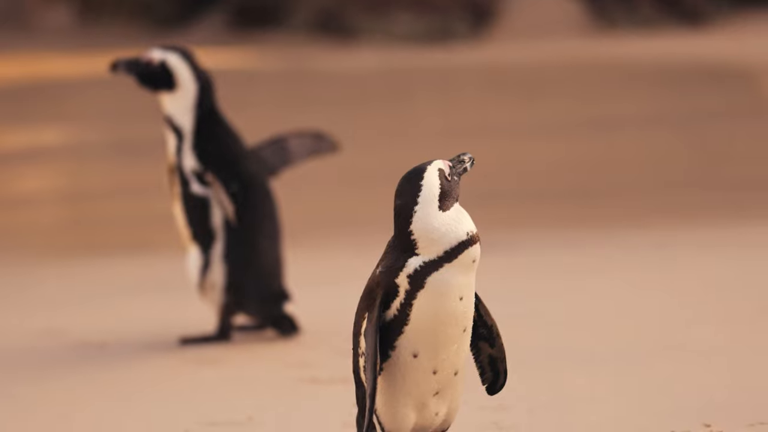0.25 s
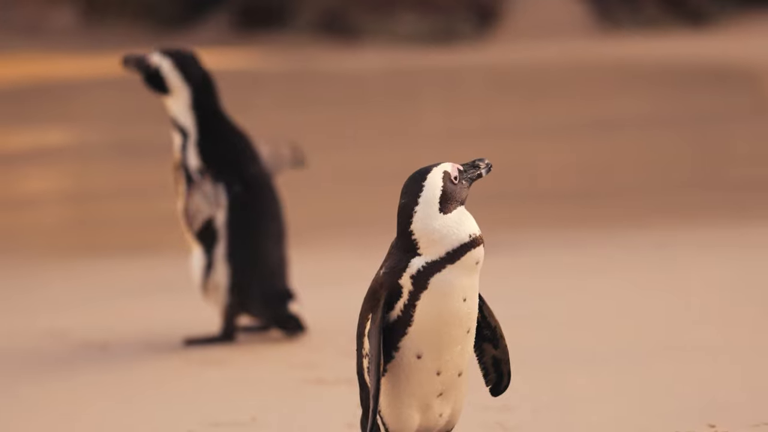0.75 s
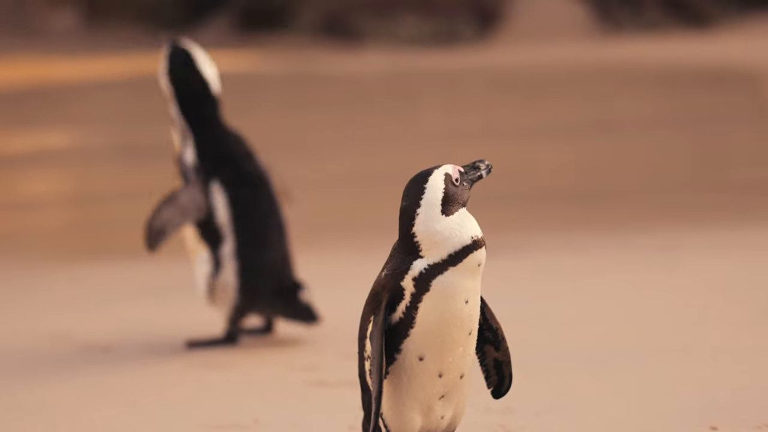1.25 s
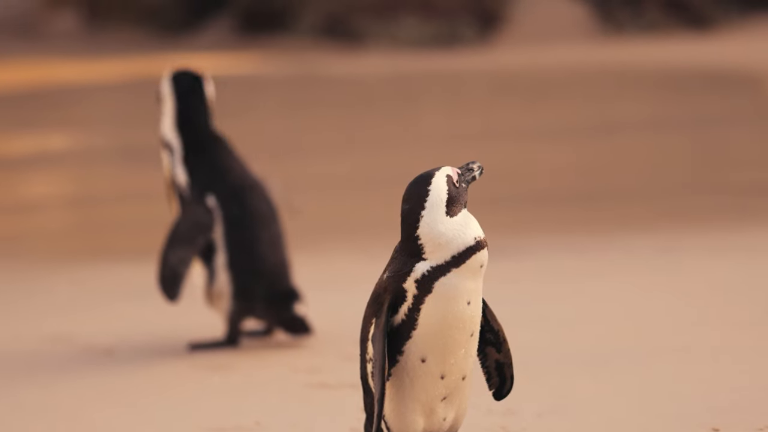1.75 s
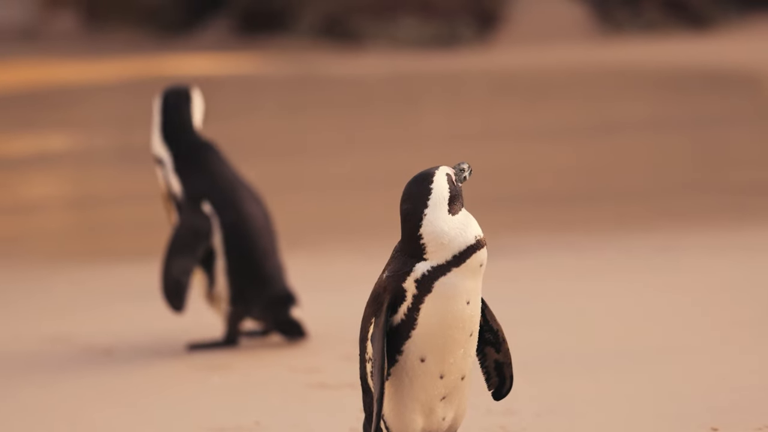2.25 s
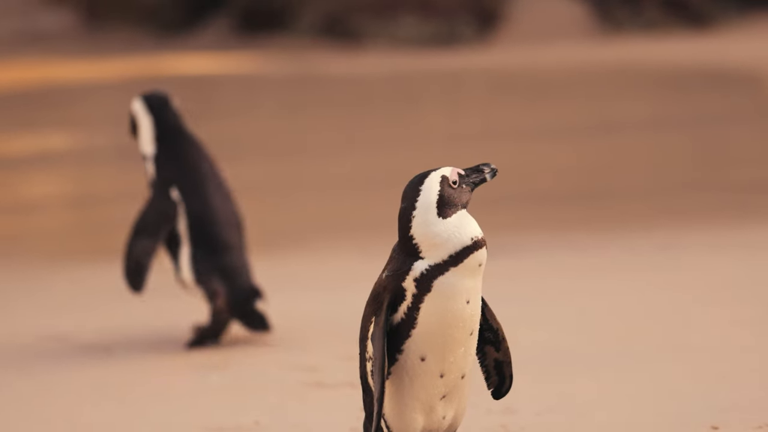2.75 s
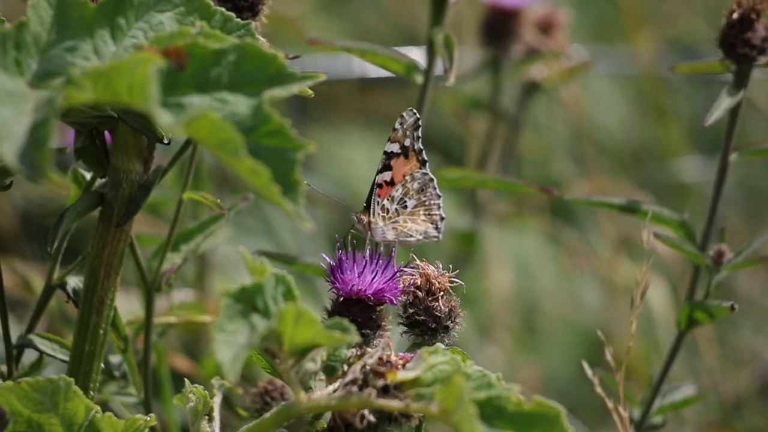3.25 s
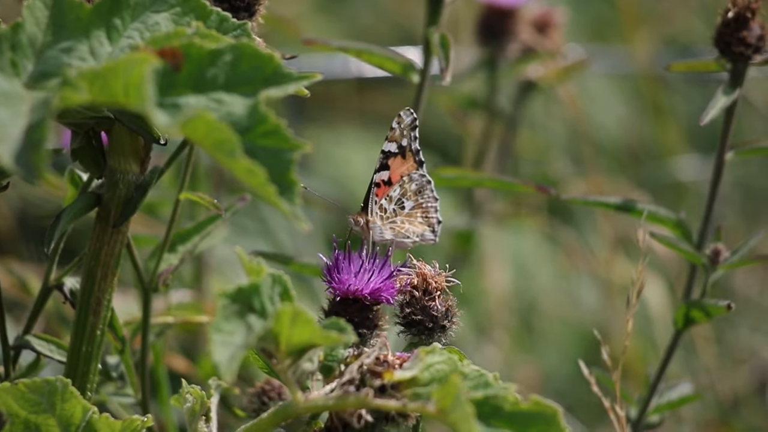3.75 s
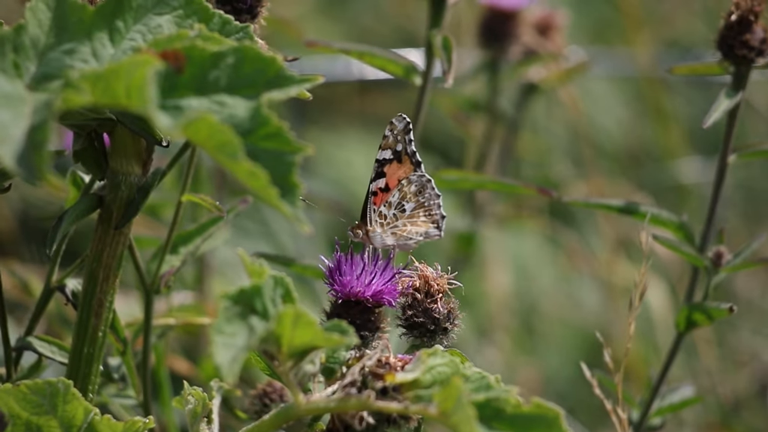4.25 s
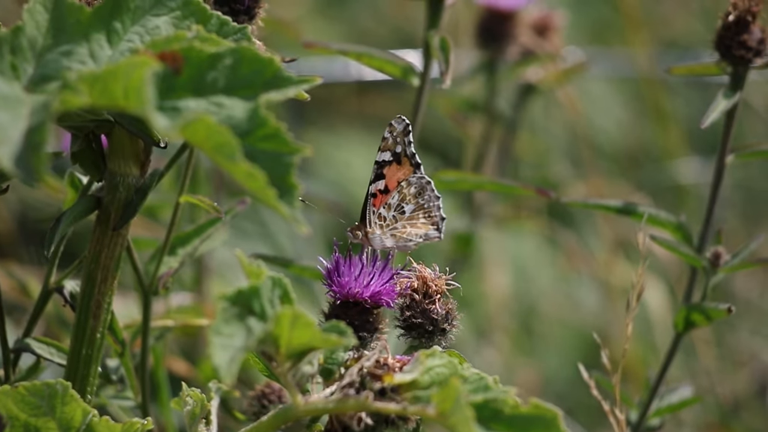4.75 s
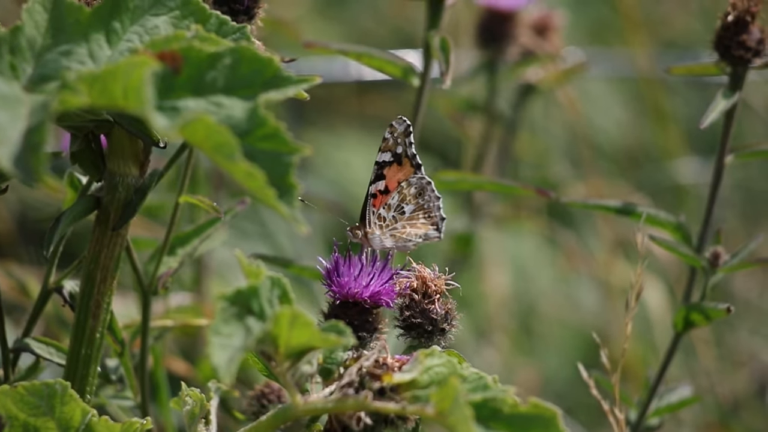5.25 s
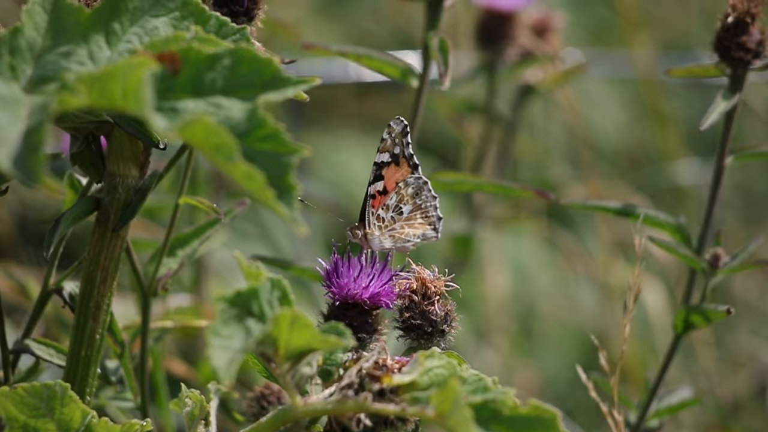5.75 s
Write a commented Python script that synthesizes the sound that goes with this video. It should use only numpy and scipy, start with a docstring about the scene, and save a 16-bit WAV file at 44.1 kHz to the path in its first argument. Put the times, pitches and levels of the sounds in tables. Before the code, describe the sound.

First half: loud, close, fairly dry penguin voices, starting with loose throat rattles and a brief nasal squeal, then three increasingly bright, rasping brays with machine-fast yelps, over soft shore wash and sandy bumps. A hard cut stops the last one before its shriek. Second half: faint outdoor hush, thin insect chirring, distant bird chips, and a songbird's rapid sliding twitter leaning slightly left, ending in a repeated two-note trill.

```python
"""Beach: penguins close by, over shore wash and dull bumps. A rattle tightens into a clean squeal; then
three brays, each a rasp breaking into arched, climbing yelps; two reach a shriek, the third is cut off.
The scene cuts to a quiet meadow: a small songbird twitters over insects and a far hum.
Voices: membrane slaps as noisy pulse trains, steady registers as harmonic sums, yelps and birdsong as
gliding tones. Wash, bumps and air: shaped noise. Insects: pulsed narrow-band noise. Hum: wavering sine."""
import sys
import numpy as np
from scipy import signal
from scipy.fft import rfft, irfft, next_fast_len
from scipy.io import wavfile
from scipy.ndimage import uniform_filter1d, map_coordinates

SR = 44100
rng = np.random.default_rng(int(sys.argv[2]) if len(sys.argv) > 2 else 0)


def wrap_up_sound(samples):
    """Save the sound to the file named by the first command line argument, as 16-bit audio."""
    columns = np.atleast_2d(samples).T
    # keep every value between -1 and 1, then stretch to whole-number steps
    tamed = np.clip(columns, -1, 1)
    steps = np.round(tamed * 32767).astype(np.int16)
    wavfile.write(sys.argv[1], SR, steps)


N = 264644

# shore wash spectrum: f/Hz, level/dB
WASH_SPECTRUM = [(18, -63), (30, -25), (98, -5), (287, 1.5), (458, -14.5), (586, -7.5), (868, -14.5),
                 (2100, -7.5), (4730, -21.5), (6000, -30), (10600, -39.5), (13800, -84.5), (22000, -120)]
# meadow air spectrum: f/Hz, level/dB
AIR_SPECTRUM = [(40, -33.5), (110, -10), (180, -1), (480, -17), (630, -9), (1500, -20), (2000, -14.5),
                (2900, -19.5), (3600, -7), (5200, -7), (7700, -14.5), (9400, -1.5), (10500, -12),
                (11500, -54)]
# bumps on the sand: t/s, level/dB
BUMPS = [(0.251, -26), (.371, -20), (0.411, -25), (0.72, -21), (0.75, -21), (0.886, -25), (1.103, -30),
         (1.467, -31), (1.625, -25), (1.791, -30), (2.426, -34)]
# bump spectrum: f/Hz, level/dB
BUMP_SPECTRUM = [(24, -45.5), (40, -22), (90, 2), (140, 1), (462, -16.5), (1200, -35), (1560, -66),
                 (2640, -120)]

# songbird figures, one row a note: t in figure/s, length/s, first f/Hz, middle f/Hz, last f/Hz, level/dB
OPENING = [(0, 0.0292, 5060, 4830, 4480, -40.5), (.065, 0.03, 8060, 7140, 5600, -38.5),
           (.093, .023, 5250, 4280, 3130, -37.5), (.115, .14, 1690, 1804, 2420, -55),
           (.198, .032, 4000, 4400, 3100, -36), (.253, 0.087, 5736, 5450, 5470, -36.5)]
# falling then rising notes, columns as OPENING: t/s, length/s, 3 x f/Hz, level/dB
DIP = [(0, 0.041, 5690, 4940, 3230, -37), (.047, 0.025, 3180, 3550, 4780, -43),
       (.076, .035, 5650, 6400, 7600, -41)]
# three falling notes and a rise, columns as OPENING: t/s, length/s, 3 x f/Hz, level/dB
DROOP = [(0, 0.06, 6620, 6345, 5930, -39.5), (.055, .05, 5950, 4710, 4200, -40),
         (.112, 0.0287, 3840, 3510, 3170, -50), (.155, 0.03, 3180, 3590, 4300, -43)]
# low note, rise, steep fall, columns as OPENING: t/s, length/s, 3 x f/Hz, level/dB
HOOK = [(0, .04, 3570, 3607, 3140, -44), (.064, .024, 3800, 6100, 6360, -42),
        (.088, .028, 7000, 5050, 3550, -44.5)]
# one falling note, columns as OPENING: t/s, length/s, 3 x f/Hz, level/dB
SWOOP = [(0, .066, 7300, 5250, 4900, -41)]
# figure repeated in the trill, columns as OPENING: t/s, length/s, 3 x f/Hz, level/dB
TICK_SLUR = [(0, .018, 7520, 6640, 6700, -39.5), (.034, .036, 6510, 4790, 3590, -39)]
# song: figure, list of start t/s
SONG = [(OPENING, [3.005]), (DIP, [3.553, 3.795]), (DROOP, [4.015, 4.28]), (HOOK, [4.636, 4.864]),
        (SWOOP, [5.575, 5.63, 5.942])]
# held songbird notes, plain or trilled: t/s, length/s, f/Hz, level/dB, trill depth/share of pitch
BUZZES = [(5.079, 0.082, 6720, -45, 0.11), (5.14, 0.43, 4460, -50.5, .001),
          (5.732, 0.076, 3890, -41.5, 0.097)]

# rattle bursts: t/s, length/s, level/dB
RATTLE_BURSTS = [(0, 0.11, -22), (.146, 0.041, -22.5), (.213, 0.017, -21.5), (0.258, 0.0072, -20),
                 (0.292, 0.079, -28.5), (0.454, .08, -34.5), (0.837, 0.044, -30), (0.962, 0.11, -36)]
# rattling throat spectrum: f/Hz, level/dB
RATTLE_SPECTRUM = [(290, -67), (500, -28.5), (782, -25), (1600, -5.5), (2120, 1), (2700, -8.5),
                   (4020, -23.5), (4570, -19), (5680, -31.5), (7430, -25.5), (10600, -48), (13800, -88),
                   (22000, -120)]
# squeal register 1, creak: t/s, f/Hz, level/dB
CREAK = [(.44, 284.4, -45.5), (.47, 296, -25.5), (.51, 339, -25), (.553, 352, -17.5)]
# register 2, clean tone: t/s, f/Hz, level/dB
CLEAN_TONE = [(.554, 421.3, -17.5), (.6, 424.4, -15.5), (.673, 432, -15), (.688, 420, -15),
              (.761, 414, -17), (.808, 413.5, -19.5), (.825, 396, -34)]
# register 3, slide: t/s, f/Hz, level/dB
SLIDE = [(.815, 2093, -15.5), (.828, 1998, -24.5), (.843, 1775, -19.5)]
# register 4, sag: t/s, f/Hz, level/dB
SAG = [(.838, 334, -25), (.867, 339.4, -24.5), (.88, 335, -24), (.922, 318, -26)]
# register 5, whistle: t/s, f/Hz, level/dB
WHISTLE = [(.919, 1584, -29), (.95, 1520, -27), (.968, 1466, -37)]
# tight throat spectrum: f/Hz, level/dB
TIGHT_THROAT = [(1250, -40.5), (1700, -9), (2120, -0.5), (2550, -6.5), (2950, -22.5), (3400, -24),
                (4100, -21.5), (5600, -53.5), (7000, -37), (12000, -72)]
# open throat spectrum: f/Hz, level/dB
OPEN_THROAT = [(300, -35.5), (1400, -23.5), (2100, -6.5), (2650, 1.5), (3100, -6.5), (3700, -25),
               (4700, -22), (5700, -41.5), (8000, -35), (12000, -58.5)]

# brays: flutter lock t/s, lead of ragged yelps/s, flutter length/s, f/Hz, first clean yelp length/s,
# ragged level/dB, clean level/dB, split level/dB, rasp level/dB, squeak between clean yelps level/dB
BRAYS = [(1.498, .122, 0.12, 2756, .007, -10, -11, -13, -24.5, -47),
         (2.163, 0.12, .13, 2952, .018, -11, -9, -12, -24.5, -29),
         (2.833, .1, .103, 2980, .011, -15, -9, -10.5, -23.5, -18)]
# rasping throat spectrum: f/Hz, level/dB
RASP_SPECTRUM = [(70, -38.5), (310, 7.5), (450, -13), (700, -4.5), (1100, -11), (1700, 0.5), (3400, -4),
                 (5700, -20), (8200, -21), (10600, -36.5), (12500, -59.5)]
# yelp partials: multiple of pitch, level/dB
YELP_PARTIALS = [(1, 2.5), (1.5, -18.5), (2, -19.5), (3, -20.5)]
# beak opening from bray to bray: t/s, treble level/dB
BEAK_OPENING = [(1.4, -7), (2.05, 4.5), (3, 7.5)]

CUT_S, TOP_HZ = 3.008, 15700  # beach to meadow; band limit
FAR_CALLS_START_S, FAR_CALLS_END_S = 3.4, 5.95
TWITTER_START_S, TWITTER_END_S = 5.1, 5.82
TRILL_START_S, TRILL_PACE_S = 5.017, .1213
TRILL_FIRST_DB, TRILL_GROWS_DB = -11.5, 1.57  # first repeat; gain per repeat
RATTLE_ATTACK_S, RATTLE_RELEASE_S = .0082, .025  # per 30 dB
# spacing of yelp centres in each stage
RAGGED_PACE_S, FLUTTER_PACE_S, SPLIT_PACE_S = .0315, .0257, .0294
RAGGED_FIRST_S, RAGGED_YELP_S, YELP_S = .015, .0033, .0071  # yelp lengths
SETTLE_YELPS = 1  # decay constant of the excess length at the start of a run
RAGGED_FADE_DB, SPLIT_GROWS_DB = 1, 1.2  # change per yelp
DRAWN_OUT_DB = 1.8  # loss per doubling of length
HALF_S, HALF_GAP_S, HALF_DROP_DB = .0043, .0093, 2.5  # split yelp: half length, spacing, loss of second
SHRIEK_AFTER_S = .244  # after the lock
SHRIEK_S, SHRIEK_DB, SHRIEK_HZ = .013, -8.5, 3400
RASP_LEAD_S, RASP_TRAIL_S = .1771, .02  # full this long before the lock and after the shriek
RASP_ATTACK_S, RASP_RELEASE_S = .03, .05  # per 30 dB
RASP_START_DB = -2.5  # swells from here to the first ragged yelp
# fade towards the lock, dip in the flutter, push at the shriek
RASP_FADE_DB, RASP_LOCKED_DB, RASP_LAST_DB = -6, -17.5, 4


def amp(db):
    """Decibels to gain."""
    return 10 ** (np.asarray(db) / 20)


def unit(x):
    """Scale to rms 1."""
    return x / np.sqrt(np.mean(x ** 2) + 1e-20)


def along(points, hz):
    """(f/Hz, value) points read on a log axis."""
    f, v = np.transpose(points)
    return np.interp(np.log(hz + 1), np.log(f + 1), v)


def clock():
    """Time of every sample, s."""
    return np.arange(N) / SR


def curves(rows):
    """One value per sample for each column after the time."""
    s, *cols = np.transpose(rows)
    return [np.interp(clock(), s, c) for c in cols]


def gate(start_s, end_s, edge_s=.0031):
    """1 between two times, with linear ramps."""
    inside = np.minimum(clock() - start_s, end_s - clock())
    return np.clip(inside / edge_s + .5, 0, 1)


def held(start_s, end_s, attack_s, release_s):
    """Full level between two times, reached and left at a steady rate in dB."""
    t = clock()
    early = np.maximum(start_s - t, 0) / attack_s
    late = np.maximum(t - end_s, 0) / release_s
    return amp(-30 * (early + late))


def noise(size=N):
    """White noise."""
    return rng.standard_normal(size)


def wobble(rate_hz, size=N):
    """Smooth random curve, rate_hz knots a second."""
    knots = noise(int(size * rate_hz / SR) + 4)
    return map_coordinates(knots, [np.arange(size) * rate_hz / SR])


def oscillate(pitch_hz):
    """Sine of varying pitch: phase is the running sum of frequency."""
    return np.sin(2 * np.pi * np.cumsum(pitch_hz) / SR)


def filtered(x, response):
    """Zero-phase filter: spectrum times a response of frequency."""
    m = next_fast_len(N + SR // 2)
    return irfft(rfft(x, m) * response(np.fft.rfftfreq(m, 1 / SR)), m)[..., :N]


def coloured(x, spectrum, size=4096):
    """Minimum-phase filter of the given spectrum, scaled to rms 1."""
    gain = amp(along(spectrum, np.fft.rfftfreq(size, 1 / SR)))
    cepstrum = irfft(np.log(gain + 1e-6))
    # folding the cepstrum makes the response causal
    cepstrum[1:size // 2] *= 2
    cepstrum[size // 2 + 1:] = 0
    ringing = irfft(np.exp(rfft(cepstrum)))
    return unit(signal.fftconvolve(x, ringing)[:N])


def add(track, start_s, sound):
    """Mix a short sound into a track."""
    i = int(np.clip(round(start_s * SR), 0, N))
    track[i:i + len(sound)] += sound[:N - i]


def echo(x, t60_s):
    """Diffuse decaying tail of unit energy, without the direct sound."""
    t = np.arange(SR // 2) / SR
    tail = noise(len(t)) * amp(-60 * t / t60_s) * (t > .004)
    return signal.fftconvolve(x, tail / np.linalg.norm(tail))[:N]


def wide(source, spread):
    """Two draws of a source as middle and side."""
    middle, side = source(), spread * source()
    return np.array([middle + side, middle - side])


def air():
    """Still meadow air: steady shaped noise."""
    return amp(-56.5) * wide(lambda: coloured(noise(), AIR_SPECTRUM), spread=.64)


def hum():
    """Far hum: sine wavering in pitch and level, stronger on the left."""
    tone = oscillate(167 + wobble(23))
    return amp(-64.5 + wobble(1.54)) * tone * amp([[2], [-3]])


def insect(centre_hz, width_hz, rate_hz, db):
    """Thin chirps of wing strokes: narrow-band noise in half-sine pulses with gaps between."""
    band = unit(filtered(noise(), lambda hz: 1 / (1 + (2 * (hz - centre_hz) / width_hz) ** 4)))
    chirps = np.maximum(np.sin(2 * np.pi * rate_hz * clock() + .5 * wobble(5.7)), 0)
    return amp(db) * unit(band * chirps)


def insects():
    """Two chirping bands at different rates."""
    return insect(9260, 450, rate_hz=4.9, db=-63) + insect(8840, 510, rate_hz=7.4, db=-58)


def note(length_s, first_hz, middle_hz, last_hz, db, trill=0):
    """Whistled parabolic glide through three pitches; a fast trill turns it into a buzz."""
    size = int(length_s * SR)
    u = np.linspace(0, 1, size)
    glide = np.polyval(np.polyfit([0, .5, 1], [first_hz, middle_hz, last_hz], 2), u)
    buzz = np.sin(2 * np.pi * 150 * u * length_s + 2 * wobble(140, size))
    pitch = glide * (1 + .0059 * wobble(400, size) + trill * buzz)
    swell = np.tanh(2 * np.sin(np.pi * u)) * amp(db + 2.66 * wobble(105, size))
    return swell * oscillate(pitch)


def far_calls(centre_hz=2050, db=-69, count=14):
    """Another bird chips faintly far off: short falling notes heard only as echoes."""
    track = np.zeros(N)
    for when, height in rng.uniform(-1, 1, (count, 2)):
        hz = centre_hz * np.exp(.18 * height)
        start_s = np.interp(when, [-1, 1], [FAR_CALLS_START_S, FAR_CALLS_END_S])
        add(track, start_s, note(.0336, 1.08 * hz, hz, .95 * hz, db))
    return echo(track, t60_s=.3)


def twitter(db=-52, count=44):
    """Softer gliding chirps at random times crowd in among the last slurs."""
    track = np.zeros(N)
    for when, height, sweep, strength in rng.uniform(-1, 1, (count, 4)):
        hz = 4700 * np.exp(.33 * height)
        tilt = np.copysign(.15, sweep - .3)  # most fall
        start_s = np.interp(when, [-1, 1], [TWITTER_START_S, TWITTER_END_S])
        add(track, start_s, note(.026, hz * (1 - tilt), hz, hz * (1 + tilt), db + 2 * strength))
    return track


def songbird():
    """Gliding figures lead into an even, swelling trill; vegetation scatters a tail to each side."""
    song = np.zeros(N)
    figures = [(figure, start_s, 0) for figure, starts in SONG for start_s in starts]
    repeats = np.arange(TRILL_START_S, N / SR, TRILL_PACE_S)
    for k, start_s in enumerate(repeats):
        figures.append((TICK_SLUR, start_s, TRILL_FIRST_DB + TRILL_GROWS_DB * k))
    for figure, start_s, db in figures:
        for offset_s, *shape in figure:
            add(song, start_s + offset_s, amp(db) * note(*shape))
    for start_s, length_s, hz, db, trill in BUZZES:
        add(song, start_s, note(length_s, hz, hz, hz, db, trill))
    scatter = np.array([echo(song, t60_s=.25) for side in range(2)])
    return song + amp(-4) * scatter


def wash():
    """Restless shore wash: shaped noise of wandering level."""
    return amp(-41.5 + 3.4 * wobble(14)) * coloured(noise(), WASH_SPECTRUM)


def bumps(t60_s=.12):
    """Dull bumps and scuffs on the sand: decaying bursts of low noise."""
    blows, t = np.zeros(N), np.arange(SR // 5) / SR
    for start_s, db in BUMPS:
        add(blows, start_s, amp(db - 60 * t / t60_s) * (1 - np.exp(-t / .001)))
    return blows * coloured(noise(), BUMP_SPECTRUM)


def flaps(rate_hz, jitter, scatter_db, air_share):
    """Uneven slaps of the throat membranes, each letting out a puff of air."""
    cycles = np.cumsum(rate_hz * np.exp(jitter * wobble(rate_hz))) / SR
    slaps = np.diff(np.floor(cycles), prepend=0)  # one impulse a cycle
    puffs = noise() * np.exp(-3 * (cycles % 1))
    level = amp(scatter_db * np.tanh(wobble(rate_hz)))
    return (unit(slaps) + air_share * unit(puffs)) * level


def windpipe(x, delay_s, reflection):
    """A reflection from the end of the flexing windpipe makes shifting resonances."""
    lag = delay_s * SR * np.exp(.25 * wobble(30))
    return x + reflection * map_coordinates(x, [np.arange(N) - lag], order=1)


def register(rows, throat, jitter, shimmer_db, even=False):
    """Steady vibration: harmonics shaped by the throat; even phases fill the cycle, else it pulses."""
    pitch, db = curves(rows)
    window = gate(rows[0][0], rows[-1][0])
    on = window > 0
    pitch = (pitch * np.exp(jitter * wobble(300)))[on]
    k = np.arange(1, 29)[:, None]
    gains = amp(along(throat, k * pitch)) * (k * pitch < TOP_HZ)
    phase = 2 * np.pi * k * np.cumsum(pitch) / SR
    phase = phase + even * np.pi / 2 * k ** 2
    voice = np.zeros(N)
    voice[on] = unit(np.sum(gains * np.cos(phase), axis=0))
    return voice * window * amp(db + shimmer_db * wobble(300))


def rattle():
    """Bursts of loose membrane slaps, coloured by windpipe and throat."""
    slaps = flaps(rate_hz=290, jitter=.25, scatter_db=4.5, air_share=.93)
    slaps = windpipe(slaps, delay_s=.000896, reflection=.99)
    bursts = np.zeros(N)
    for start_s, length_s, db in RATTLE_BURSTS:
        bursts += amp(db) * held(start_s, start_s + length_s, RATTLE_ATTACK_S, RATTLE_RELEASE_S)
    return bursts * coloured(slaps, RATTLE_SPECTRUM)


def squeal():
    """A rattle tightens to a creak; the voice jumps registers: clean tone, slide, sag, whistle."""
    voice = rattle()
    voice += register(CREAK, OPEN_THROAT, jitter=.086, shimmer_db=2.5)
    voice += register(CLEAN_TONE, TIGHT_THROAT, jitter=.002, shimmer_db=.6, even=True)
    voice += register(SLIDE, TIGHT_THROAT, jitter=.021, shimmer_db=1.5)
    voice += register(SAG, TIGHT_THROAT, jitter=.0087, shimmer_db=0)
    voice += register(WHISTLE, TIGHT_THROAT, jitter=.0074, shimmer_db=1.5)
    return voice


def squeak(hz, wander, jitter, flicker_db):
    """Unsteady tone of a weakly driven membrane."""
    pitch = hz * np.exp(wander * wobble(90) + jitter * wobble(900))
    return unit(amp(flicker_db * np.tanh(wobble(160))) * oscillate(pitch))


def rasp(squeak_db=-7, unsteady_db=3):
    """Air forced through the slack throat; in the locked flutter it gives way to a low squeak."""
    level, between = np.zeros(N), np.zeros(N)
    for lock_s, lead_s, flutter_s, *_, rasp_db, between_db in BRAYS:
        shriek_s = lock_s + SHRIEK_AFTER_S
        ragged_s = lock_s - lead_s
        start_s = lock_s - RASP_LEAD_S
        half_pace_s = FLUTTER_PACE_S / 2
        tightening = np.interp(clock(), [ragged_s, lock_s - FLUTTER_PACE_S, lock_s], [0, 1, 0])
        locked = gate(lock_s - half_pace_s, lock_s + flutter_s + half_pace_s, edge_s=.024)
        push = gate(shriek_s, np.inf, edge_s=.04)
        db = rasp_db + np.interp(clock(), [start_s, ragged_s], [RASP_START_DB, 0])
        db = db + RASP_FADE_DB * tightening + RASP_LOCKED_DB * locked + RASP_LAST_DB * push
        breath = held(start_s, shriek_s + RASP_TRAIL_S, RASP_ATTACK_S, RASP_RELEASE_S)
        level += breath * amp(db)
        between += amp(between_db) * gate(lock_s, lock_s + flutter_s, edge_s=.02)
    level *= amp(unsteady_db * np.tanh(wobble(80)))
    slaps = flaps(rate_hz=345, jitter=.14, scatter_db=14, air_share=.2)
    slaps = 7 * np.tanh(slaps / 7)  # soft tissue rounds off the hardest slaps
    growl = coloured(windpipe(slaps, delay_s=.00168, reflection=.88), RASP_SPECTRUM)
    loose = squeak(hz=2297, wander=.34, jitter=.082, flicker_db=9.5)
    low = squeak(hz=1980, wander=.05, jitter=.05, flicker_db=8.5)
    return level * (growl + amp(squeak_db) * loose) + between * low


def settling(centres_s, first_s, usual_s, db):
    """Run of yelps settling from a first to a usual length: rows centre t/s, level/dB, length/s."""
    lengths_s = usual_s + (first_s - usual_s) * np.exp(-np.arange(len(centres_s)) / SETTLE_YELPS)
    return list(zip(centres_s, db - DRAWN_OUT_DB * np.log2(lengths_s / usual_s), lengths_s))


def surges():
    """Pressure surges of all brays, stage by stage: rows centre t/s, level/dB, length/s, top f/Hz."""
    rows = []
    for lock_s, lead_s, flutter_s, hz, first_s, ragged_db, clean_db, split_db, *_ in BRAYS:
        shriek_s = lock_s + SHRIEK_AFTER_S
        half_pace_s = FLUTTER_PACE_S / 2
        ragged = np.arange(lock_s - lead_s, lock_s - half_pace_s, RAGGED_PACE_S)
        clean = np.arange(lock_s, lock_s + flutter_s + half_pace_s, FLUTTER_PACE_S)
        split = np.arange(clean[-1] + FLUTTER_PACE_S, shriek_s - half_pace_s, SPLIT_PACE_S)
        fading_db = ragged_db - RAGGED_FADE_DB * np.arange(len(ragged))
        run = settling(ragged, RAGGED_FIRST_S, RAGGED_YELP_S, fading_db)
        run += settling(clean, first_s, YELP_S, clean_db)
        for k, centre_s in enumerate(split):
            db = split_db + SPLIT_GROWS_DB * k
            run.append((centre_s, db, HALF_S))
            if centre_s + SPLIT_PACE_S < shriek_s:  # the last runs straight into the shriek
                run.append((centre_s + HALF_GAP_S, db - HALF_DROP_DB, HALF_S))
        run.append((shriek_s, SHRIEK_DB, SHRIEK_S))
        for centre_s, db, length_s in run:
            strain = max(centre_s - lock_s, 0) / SHRIEK_AFTER_S
            rows.append((centre_s, db, length_s, hz + (SHRIEK_HZ - hz) * strain ** 2))
    return rows


def yelp(db, length_s, top_hz, louder, higher):
    """One surge sets a stiff membrane squeaking; pitch arches with the surge, weak surges are rough."""
    rough = np.clip((-4 - db) / 22, 0, 1)  # strong surges lock into a clean tone
    size = int(4 * length_s * SR)
    u = np.linspace(-2, 2, size)  # time in yelp lengths
    surge = np.exp(-np.abs(2 * u) ** 2.3) + .37 * np.exp(-(2 * (u - .6)) ** 2)
    slant = .1 * np.clip((3200 - top_hz) / 120, -2, 1)  # the highest yelps rise, the others fall
    arch = 1 - .34 * (1 - np.exp(-(1.5 * (u + slant)) ** 2))
    pitch = top_hz * (1 + .01965 * higher) * arch
    phase = 2 * np.pi * np.cumsum(pitch * np.exp(.23 * rough * wobble(1800, size))) / SR
    wave = np.zeros(size)
    for k, partial_db in YELP_PARTIALS:
        growth = surge ** np.clip(k - 1, 0, .5)  # overtones grow at the top of the surge
        wave += amp(partial_db) * growth * np.sin(k * phase)
    flutter = amp(4 * rough * wobble(700, size))
    flutter /= np.sqrt(np.average(flutter ** 2, weights=surge ** 2))
    hiss = .22 * rough * noise(size)
    return amp(db + 1.68 * louder) * surge * flutter * (wave + hiss)


def yelps():
    """All membrane yelps, each centred on its pressure surge, with the top treble rolled off."""
    track = np.zeros(N)
    for centre_s, db, length_s, top_hz in surges():
        louder, higher = noise(2)
        add(track, centre_s - 2 * length_s, yelp(db, length_s, top_hz, louder, higher))
    return filtered(track, lambda hz: amp(along([(9300, -.5), (12500, -26)], hz)))


def brays(beak_hz=5600):
    """Rasp and yelps leave through a beak that opens wider bray by bray, letting more treble out."""
    squeaks = yelps()
    locked = uniform_filter1d(np.abs(squeaks), size=900)  # a membrane locked into a yelp stops rasping
    voice = squeaks + rasp() / (1 + (locked / .11) ** 2)
    treble = filtered(voice, lambda hz: 1 - 1 / (1 + (hz / beak_hz) ** 10))
    return voice + (amp(curves(BEAK_OPENING)[0]) - 1) * treble


def meadow():
    """Song and insects over air and hum, the whole a little to the left."""
    background = air() + hum() + wide(insects, spread=.24)
    birds = far_calls() + wide(twitter, spread=1) + songbird()
    return (background + birds) * amp([[1.2], [-1.2]])


def beach():
    """Penguins, their echo and bumps over the wash, deepest bass rolled off."""
    penguins = squeal() + brays()
    sound = wash() + bumps() + amp(-21.5) * echo(penguins, t60_s=.088) + penguins
    return signal.sosfilt(signal.butter(8, 82, "high", fs=SR, output="sos"), sound)


def scene():
    """The beach, then the meadow; the cut falls before the third bray's shriek."""
    before = gate(-1, CUT_S)
    return beach() * before + meadow() * (1 - before)


def record(dry):
    """Nothing is kept above the band limit."""
    return filtered(dry, lambda hz: hz < TOP_HZ)


dry = scene()
out = record(dry)
wrap_up_sound(out)
```